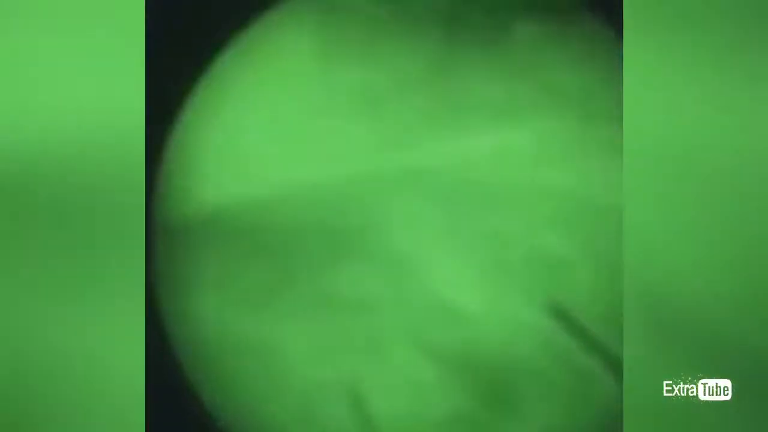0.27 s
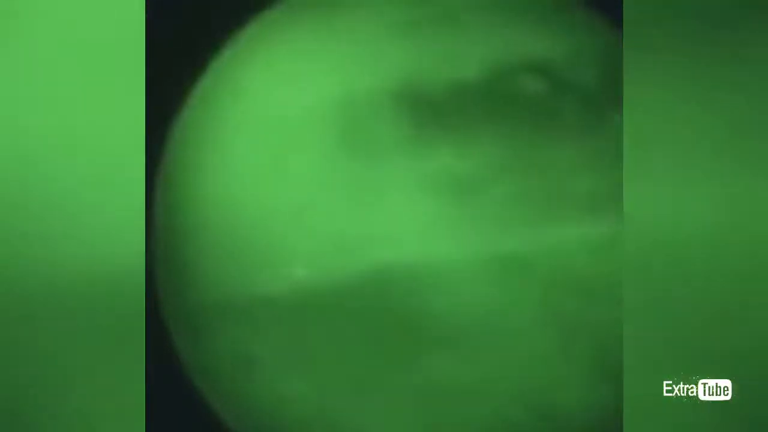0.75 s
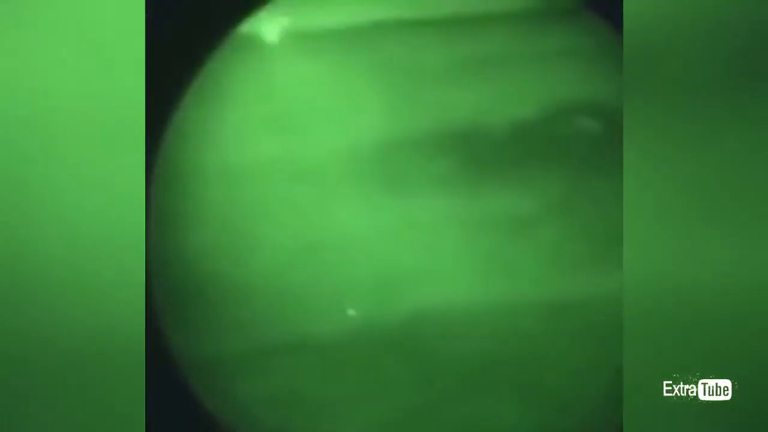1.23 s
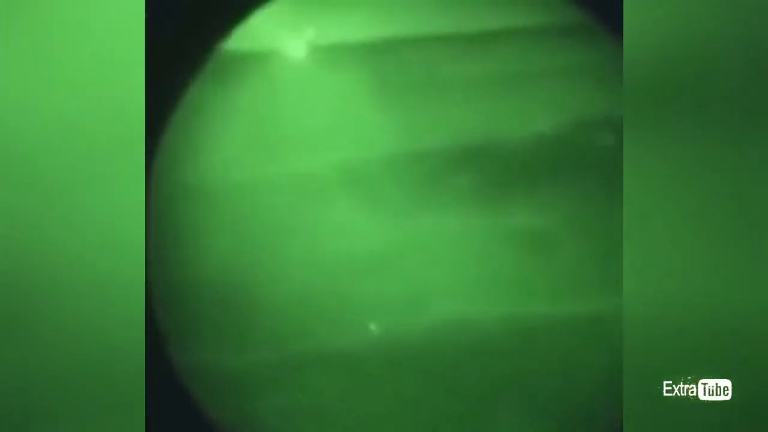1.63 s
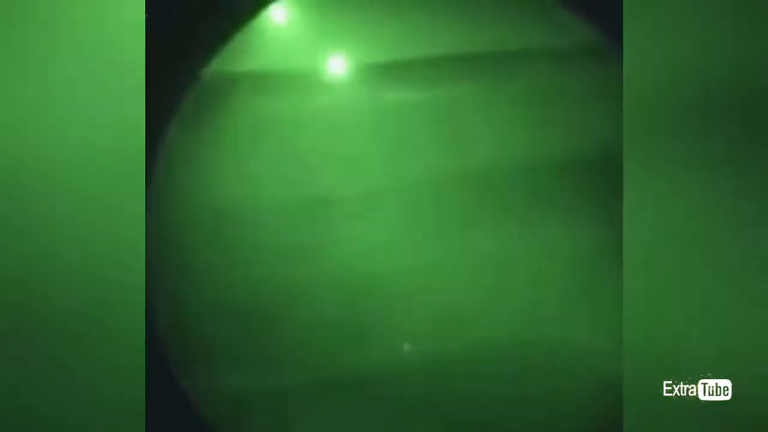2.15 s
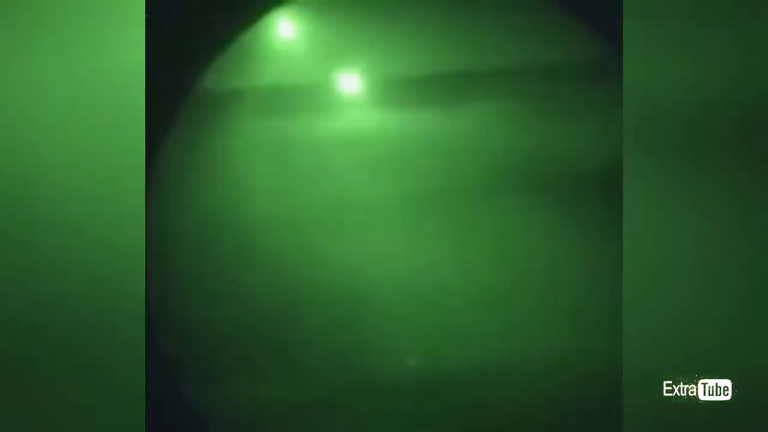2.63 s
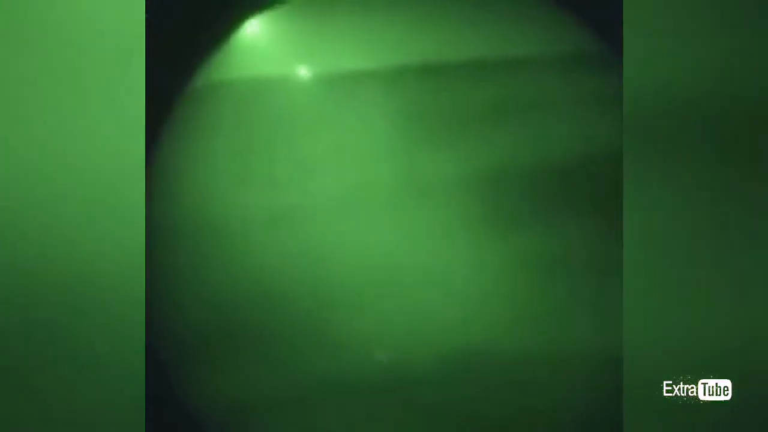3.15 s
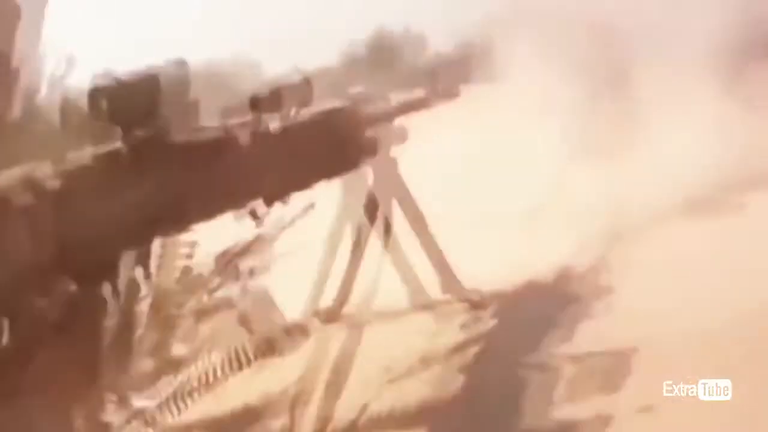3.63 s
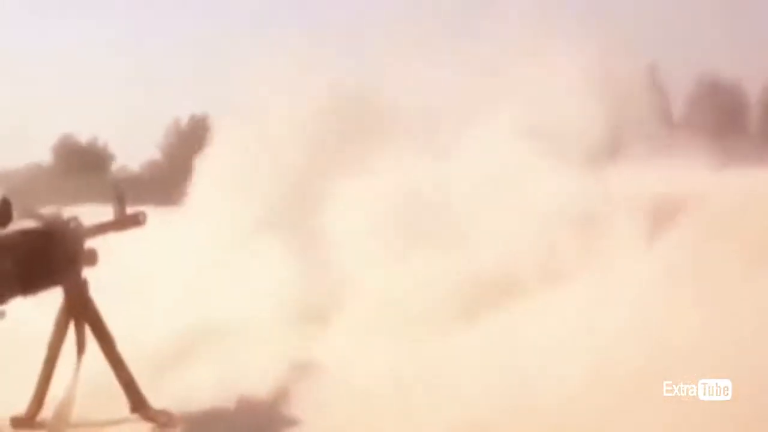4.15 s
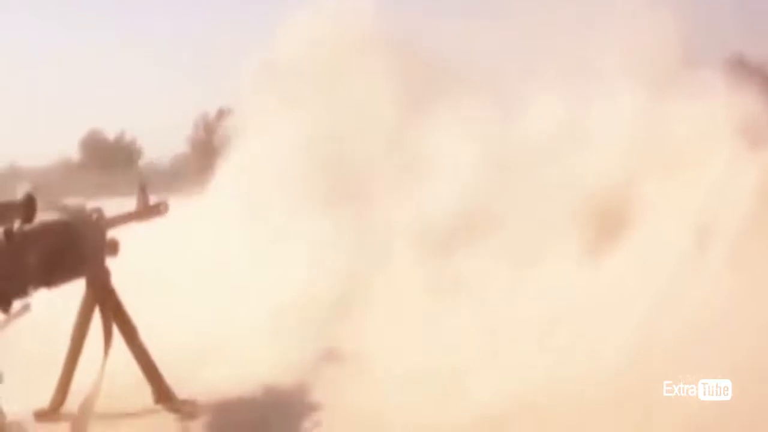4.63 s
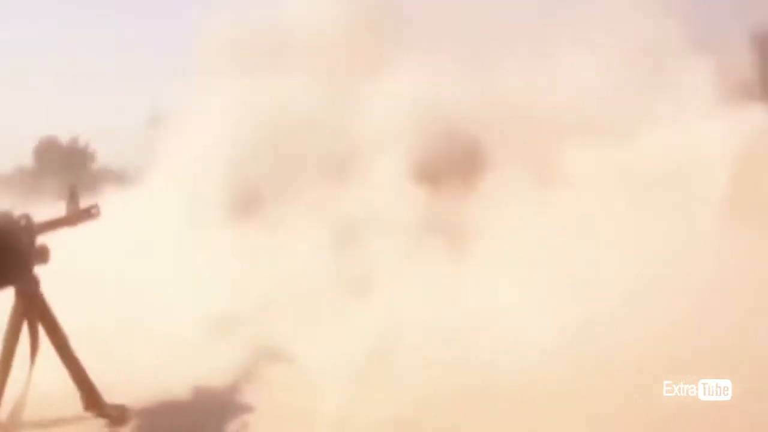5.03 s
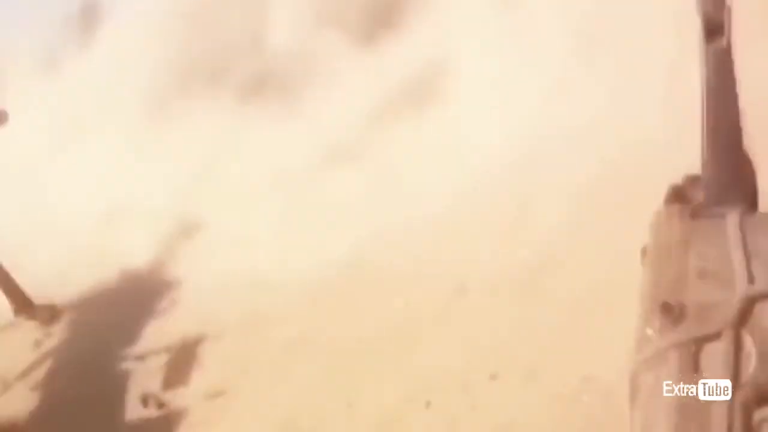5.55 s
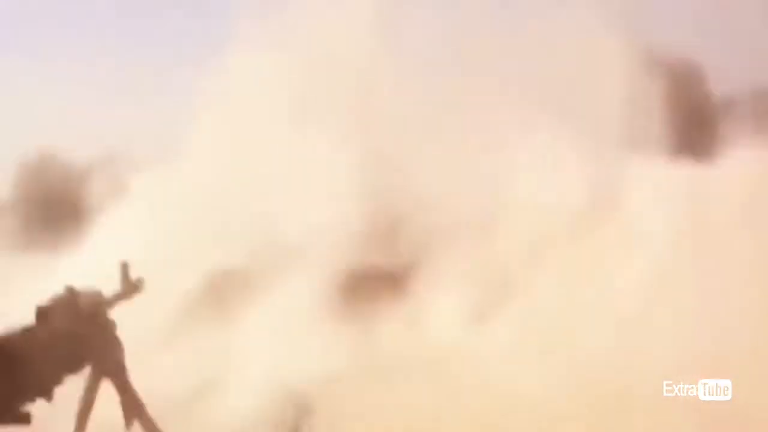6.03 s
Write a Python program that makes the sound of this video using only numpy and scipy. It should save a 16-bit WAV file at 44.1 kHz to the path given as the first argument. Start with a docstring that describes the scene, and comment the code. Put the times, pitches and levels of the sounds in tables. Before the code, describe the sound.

A heavy machine gun fires one last shot close by, belt links clank, a ricochet whines, and brass cases tinkle over a distant rumble. It fires ten thumping, metallic shots, its echo rolling over open land. After a blink of silence, a lighter gun cracks out a long, even burst that overloads the close microphone, then stops with small rattles.

```python
"""Two machine guns on an open range

The microphone stands close to each gun in turn, a moment of silence between them.
At night a heavy gun ends a burst, spent cases ring, and it fires again over the rolling echo of the land.
By day a lighter gun fires one long burst: each blast overloads the microphone and slaps back from ground and banks.
Blasts and clashes are shaped noise, slaps and pushes are short pressure waves, ringing metal is sines and resonances."""
import sys
import numpy as np
from scipy import signal
from scipy.fft import rfft, irfft, next_fast_len
from scipy.io import wavfile

SR = 44100
rng = np.random.default_rng(int(sys.argv[2]) if len(sys.argv) > 2 else 0)


def materialize(psi):
    """Save the field psi as 16-bit PCM at rate SR to the path in sys.argv[1].

    A 1-D psi becomes a single channel; in a 2-D psi each row is a channel.
    """
    bounded = np.clip(np.atleast_2d(psi).T, -1, 1)
    quanta = np.round(bounded * 32767).astype(np.int16)
    wavfile.write(sys.argv[1], SR, quanta)


N = 276939
TIME = np.arange(N) / SR
# In every spectrum table below, level_db shapes the tone only; the loudness is set where it is played.


def amp(db):
    """Decibels to gain."""
    return 10 ** (np.asarray(db) / 20)


def unit(x):
    """Scales to rms 1."""
    return x / np.sqrt(np.mean(x ** 2) + 1e-20)


def add(mix, s, sound):
    """Mixes a sound in at time s."""
    part = mix[max(round(s * SR), 0):][:len(sound)]
    part += sound[:len(part)]


def colour(x, spectrum):
    """Gives x a spectrum that falls away steeply beyond its ends; rms 1."""
    f, db = np.transpose(spectrum)
    size = next_fast_len(len(x))
    hz = np.fft.rfftfreq(size, 1 / SR) + 1  # keeps the logarithm finite
    ends = np.minimum(hz / f[0], 1) ** 2 * np.minimum(f[-1] / hz, 1) ** 2
    gain = ends * amp(np.interp(np.log(hz), np.log(f), db))
    return unit(irfft(rfft(x, size) * gain, size)[:len(x)])


def noise(spectrum, grain_db=0, grain_s=.002, size=N):
    """Coloured noise whose level wanders by grain_db, so that it comes in short clumps."""
    knots = rng.standard_normal(size // 8)
    clumps = np.interp(TIME[:size] / max(grain_s, .0003), np.arange(len(knots)), knots)
    return colour(rng.standard_normal(size) * amp(grain_db * clumps), spectrum)


def wander(u, knots):
    """Random curve through the knots, one knot per unit of u."""
    return np.interp(u, np.arange(len(knots)), knots)


def burst(t, rise, hold, fall):
    """Envelope that rises, holds until time hold and dies exponentially."""
    return np.clip(t / rise, 0, 1) * np.exp(-np.maximum(t - hold, 0) / fall)


def strikes(rows, shape):
    """Level of overlapping blows (start_s, level_db) that share one envelope; their powers add."""
    power = np.zeros(N)
    for s, db in rows:
        add(power, s, (amp(db) * shape) ** 2)
    return np.sqrt(power)


def pulse(t, hz, cycles):
    """A pressure wave reduced to a few swings about its trough."""
    return -np.cos(2 * np.pi * hz * t) * np.exp(-(t * hz / cycles) ** 2)


def ringing(spectrum, fall, share):
    """Response of a steel body: the blow itself plus a thicket of modes that die together."""
    t = TIME[:SR // 5]
    tail = noise(spectrum, size=len(t)) * np.exp(-t / fall)
    return np.sqrt(1 - share) * (t == 0) + np.sqrt(share) * tail / np.linalg.norm(tail)


def pings(spectrum, per_s, fall, count=90):
    """Many small pieces of metal, each with its own pitch, struck at random per_s times a second."""
    t, out = TIME[:SR // 8], np.zeros(N)
    for hz in rng.uniform(4000, 15500, count):
        ping = np.sin(2 * np.pi * hz * t) * np.exp(-t / fall)
        starts = np.cumsum(rng.exponential(1, size=120)) / per_s
        for s, size in zip(starts, rng.standard_normal(size=120)):
            add(out, s, amp(1.8 * size) * ping)
    return colour(out, spectrum)


# The land at night, one row each for rumble, boom and roar:
# shot_echo_db, echo_fall_s, far_hills_db, steady_background_db
NIGHT_LAND = [(-34, 0.2, -30, -43.5), (-31, 0.41, -37, -47.5), (-30, 0.24, -29, -38)]
# Spectrum of the low rumble: freq_hz, level_db
RUMBLE_SPECTRUM = [(15, -30), (25, -16), (59, -3), (97, -4.5), (140, -1.5), (170, -9), (220, -26),
                   (370, -120)]
# Spectrum of the hollow boom from afar: freq_hz, level_db
FAR_BOOM_SPECTRUM = [(130, -3.5), (190, 4), (260, -2), (340, -16), (480, -27.5)]
# Spectrum of the distant roar: freq_hz, level_db
ROAR_SPECTRUM = [(180, -32.5), (300, 0), (408, -3), (477, -3), (574, -2), (1470, -0.5), (3890, -18.5),
                 (7910, -32), (9090, -35), (12000, -57), (15600, -74), (22000, -120)]
# Spectrum of the blast scattered by ground and scrub: freq_hz, level_db
SCRUB_SPECTRUM = [(1200, -24), (2200, 11.5), (4000, 4.5), (6500, 3.5), (9000, -1.5), (14500, -12)]
HILLS_S, HILLS_RISE_S, HILLS_FALL_S = 1.41, 0.8, 0.42  # earlier fire returns from the far hills in one swell


def night_roll():
    """The land returns the shots as a lumpy rumble, a hollow boom and a distant roar; the nearer ground hisses."""
    hills = np.exp(np.minimum((TIME - HILLS_S) / HILLS_RISE_S, (HILLS_S - TIME) / HILLS_FALL_S))
    levels = []
    for echo_db, fall, hills_db, steady_db in NIGHT_LAND:
        echo = strikes([(row[0], echo_db) for row in HEAVY_GUN_SHOTS], burst(TIME, 0.017, 0.02, fall))
        levels.append(np.sqrt(echo ** 2 + (amp(hills_db) * hills) ** 2 + amp(steady_db) ** 2))
    rumble = levels[0] * noise(RUMBLE_SPECTRUM, grain_db=1.5, grain_s=0.012)
    boom = levels[1] * noise(FAR_BOOM_SPECTRUM, grain_db=1.0, grain_s=.015)
    roar = levels[2] * noise(ROAR_SPECTRUM, grain_db=1.9, grain_s=0.0042)
    hiss = strikes([row[:2] for row in HEAVY_GUN_SHOTS], burst(TIME[:SR], 0.039, 0.33, 0.14))
    hiss *= amp(-19.5) * noise(SCRUB_SPECTRUM, grain_db=2.5, grain_s=.006)
    return rumble + boom + roar + hiss


# Spectrum of the steady air by day: freq_hz, level_db
DAY_AIR_SPECTRUM = [(24, -65.5), (40, -21), (108, -28), (443, -2), (478, 1.5), (514, 0), (612, -0.5),
                    (1170, -18.5), (2580, -9), (3140, -22.5), (3930, -26), (5560, -29), (15000, -53)]


def day_air():
    """The steady, slightly uneven noise of the range by day."""
    return amp(-49) * noise(DAY_AIR_SPECTRUM, grain_db=2.5, grain_s=0.0055)


SLAP_NEAR_HZ, SLAP_FAR_HZ, SLAP_DULL_S = 715, 400, 0.015  # longer paths return a duller wave
SNAP_DB, SNAP_HZ, SNAP_REACH_S = -9.5, 1490, 0.054  # the sharp edge fades with the length of the path


def slap(t, delay):
    """One reflection of the blast: the longer its path, the duller it returns."""
    hz = SLAP_FAR_HZ + (SLAP_NEAR_HZ - SLAP_FAR_HZ) * np.exp(-delay / SLAP_DULL_S)
    snap = amp(SNAP_DB) * np.exp(-(delay / SNAP_REACH_S) ** 2)
    return pulse(t - delay, hz, 0.57) + snap * pulse(t - delay, SNAP_HZ, 0.81)


# Slaps from the ground and the banks after each shot: delay_s, level_db
BANK_SLAPS = [(0.0131, -4.5), (0.0233, -12.5), (.0265, -4.5), (0.0283, -13), (0.0428, -14), (0.0467, -8.5),
              (.0644, -10), (0.0847, -12), (0.0888, -20)]
# Spectrum of the scatter from the far slope: freq_hz, level_db
DAY_ECHO_SPECTRUM = [(24, -71), (40, -28.5), (177, -9.5), (206, -6.5), (346, -2), (466, -1.5), (643, -3),
                     (784, -6.5), (956, -15), (1230, -27), (1730, -21), (2280, -21), (4030, -29),
                     (5700, -36.5), (15000, -50)]
SIZZLE_SPECTRUM = [(1500, -26), (2100, -4.5), (2550, 3.0), (3200, -7), (4000, -2.5),
                   (5000, -24), (9000, -28.5)]  # freq_hz, level_db


def day_echoes():
    """Every shot meets the same ground and banks: distinct slaps, then scatter from the far slope."""
    t, out = TIME[:SR], np.zeros(N)
    slaps = sum(amp(db) * slap(t, delay) for delay, db in BANK_SLAPS)
    spread = burst(t - .008, 0.0076, 0.15, 0.089) + amp(-22.0) * burst(t, 0.087, 0.076, 0.14)
    scatter = noise(DAY_ECHO_SPECTRUM, grain_db=1, grain_s=0.0016, size=SR)  # the same after every shot
    for s, _, _ in LIGHT_GUN_SHOTS:
        stirred = noise(DAY_ECHO_SPECTRUM, grain_db=3.5, grain_s=.005, size=SR)  # new for each shot
        add(out, s, slaps + spread * (amp(-28.5) * scatter + amp(-27) * stirred))
    # the land already rings as the burst opens
    earlier = amp(-20.5) * burst(TIME - DAY_START_S, .001, 0.026, 0.19) * noise(DAY_ECHO_SPECTRUM)
    # the bullets' crack returns from down the range
    sizzle = strikes([row[:2] for row in LIGHT_GUN_SHOTS], burst(t, 0.13, 0.35, 0.2))
    sizzle *= amp(-37.5) * noise(SIZZLE_SPECTRUM, grain_db=3.0, grain_s=0.0041)
    return out + earlier + sizzle


# Short low waves by day: the first two are slaps from an earlier shot, the rest dull knocks:
# start_s (of the trough), level_db, pitch_hz
LOW_WAVES = [(3.4317, -3.5, 258), (3.454, -12, 540), (5.598, -11.5, 515), (5.609, -14, 536),
             (5.68, -21, 400), (5.805, -29, 450), (6.26, -28.5, 520)]


def low_waves():
    """Slaps from an earlier shot, then dull knocks, each a short pressure wave of a swing or two."""
    out = np.zeros(N)
    for s, db, hz in LOW_WAVES:
        add(out, s - .01, amp(db) * pulse(TIME[:SR] - .01, hz, .8))
    return out


# Ricochets whining away at night: start_s, length_s, level_db, first_pitch_hz, last_pitch_hz
RICOCHET_WHINES = [(0.145, 0.061, -29, 2200, 2320), (0.2, 0.15, -34, 2100, 1510),
                   (2.863, .11, -33, 2000, 1500)]
TUMBLE_HZ_SHARE, TUMBLE_DB, TUMBLE_S = 0.025, 3, 0.002  # a tumbling bullet flutters in pitch and level


def ricochets():
    """Tumbling bullets whine briefly, their pitch settling as they fly off."""
    out = np.zeros(N)
    for s, length, db, first_hz, last_hz in RICOCHET_WHINES:
        u = np.linspace(0, 1, int(length * SR))
        wobble, flutter = (wander(u * length / TUMBLE_S, k) for k in rng.standard_normal(size=(2, 80)))
        hz = last_hz + (first_hz - last_hz) * (1 - u) ** 2
        hz *= 1 + TUMBLE_HZ_SHARE * wobble
        level = amp(db + TUMBLE_DB * flutter) * np.sin(np.pi * u)
        add(out, s, level * np.sin(2 * np.pi * np.cumsum(hz) / SR))
    return out


# Spent cases bouncing: start_s, tick_db, ring_db
CASE_BOUNCES = [(0.874, -24, -25.5), (0.909, -23, -27), (1.063, -20, -19.5), (1.102, -22, -27),
                (1.141, -30, -27), (1.206, -35, -29.5), (1.274, -29, -32), (1.309, -22, -36.5),
                (1.365, -29, -52)]
# Ringing modes of a brass case, levels relative to each other: pitch_hz, level_db
BRASS_MODES = [(3774, -52), (5631, -47), (6551, -41), (7117, -31.5), (7650, -63), (8140, -32), (9033, -46),
               (10449, -42), (10837, -40), (11816, -51), (12252, -41), (13878, -35), (14740, -39),
               (15208, -39)]
# Spectrum of the tick at each bounce: freq_hz, level_db
TICK_SPECTRUM = [(4500, -21), (5300, -19), (6500, -4), (7700, 1), (9100, -1), (10000, -9), (14000, -24),
                 (15500, 1.5)]
# Short high pings of the cases as they bounce: start_s, level_db, pitch_hz
CASE_PINGS = [(0.873, -24.5, 4230), (0.907, -27, 4200), (1.135, -36, 4980), (1.207, -23, 6550),
              (1.285, -34, 4980)]
SKITTER_SPECTRUM = [(4500, -15), (5600, -29), (6500, 3), (7700, -14), (9100, 5), (10000, -23),
                    (14000, -17)]  # freq_hz, level_db
CASES_REST_S = 1.41
SPIN_S, SPIN_DB, SPIN_SHARE = 0.018, 5, 0.0014  # a tumbling case: time of a swing, its swing in level and in pitch


def cases():
    """Brass cases tick and ping as they bounce, ring unevenly as they tumble, and skitter until they rest."""
    t, ring = TIME[:SR * 3 // 4], np.zeros(N)
    hz, db = np.transpose(BRASS_MODES)[:, :, None]
    t60 = .7 * (8000 / hz) ** .7  # higher modes die sooner (s)
    for s, _, ring_db in CASE_BOUNCES:
        place, turn, detune = rng.standard_normal((3, len(hz), 1))
        # each mode swings towards and away from the microphone on its own
        facing = np.array([wander(t / SPIN_S, k) for k in rng.standard_normal(size=(len(hz), 64))])
        pitch = hz * (1 + 0.00077 * detune + SPIN_SHARE * facing[::-1])
        cycles = np.cumsum(pitch, axis=1) / SR
        modes = amp(db + 2.1 * place) * np.sin(2 * np.pi * (cycles + turn))
        modes *= amp(ring_db) / modes.sum(0).std()
        add(ring, s, (modes * amp(SPIN_DB * facing - 60 * t / t60)).sum(0))
    for s, ping_db, ping_hz in CASE_PINGS:
        add(ring, s, amp(ping_db) * np.sin(2 * np.pi * ping_hz * t) * np.exp(-t / 0.0069))
    ticks = strikes([row[:2] for row in CASE_BOUNCES], burst(t, .0008, 0.0023, 0.0094))
    ticks *= noise(TICK_SPECTRUM, grain_db=8)
    skitter = amp(-29.5) * burst(TIME - 1.09, 0.014, 0.039, 0.19)
    skitter *= pings(SKITTER_SPECTRUM, per_s=22, fall=0.013)
    return (ring + ticks + skitter) * np.exp(-np.maximum(TIME - CASES_REST_S, 0) / 0.0099)


# The heavy action after each shot, from unlocking to slamming shut on the next round:
# delay_s, level_db (relative)
HEAVY_BOLT_CYCLE = [(.001, -4), (.016, -4.5), (0.043, -12), (.083, -2.5), (0.095, -7.5)]
BOLT_SPREAD_DB = 0.5  # from blow to blow
SLACK_DB, SLACK_S = -11.5, 0.296  # the belt clashes more softly until it has pulled taut


def bolt_blows():
    """The action repeats one cycle after every shot of the full burst: rows (start_s, level_db)."""
    times = [row[0] for row in HEAVY_GUN_SHOTS[1:]]
    s, db = np.transpose([(shot + delay, db) for shot in times for delay, db in HEAVY_BOLT_CYCLE])
    slack = SLACK_DB * np.exp(-(s - times[0]) / SLACK_S)
    return list(zip(s, db + slack + BOLT_SPREAD_DB * rng.standard_normal(len(s))))


# Single clanks as the heavy gun starts, stops and the belt swings out, levels relative:
# start_s, clash_db, ring_db, link_pitch_hz (of the link that is hit)
BELT_CLANKS = [(.0044, -7.5, -24, 8620), (0.024, -10.5, -45, 8500), (.2094, -18, -38, 8800),
               (.385, -30, -48, 6000), (.546, -28, -40.5, 8700), (.5844, -33, -43.5, 8700),
               (.6674, -33, -58, 8700), (0.801, -32, -51, 8800), (1.601, -1.5, -40, 8650),
               (2.688, -12, -38, 6400), (2.7975, -19, -29.5, 6330), (2.865, -35, -29.5, 6420),
               (2.932, -36, -33, 8850), (2.995, -23, -36, 7200), (3.1167, -23, -31.5, 6405),
               (3.3785, -23, -48, 7400)]
# Spectrum of the clash of steel: freq_hz, level_db
STEEL_SPECTRUM = [(1760, -26.5), (3000, -14), (3420, -13.5), (5130, -9.5), (6210, -7.5), (8530, 4),
                  (10500, -14), (14600, -12), (15500, -18.5)]
# Resonances of the loose links, levels relative: pitch_hz, width_hz, level_db
LINK_RESONANCES = [(6380, 25, 1), (6450, 144, -3.5), (7060, 47, -4.5), (8650, 21, -3), (8820, 37, 2.5),
                   (9970, 27, -10.5), (10970, 82, -13.5), (14100, 52, -16.5)]
# Spectrum of the jingling links: freq_hz, level_db
JINGLE_SPECTRUM = [(3240, -51.5), (5500, -27), (6320, -3), (7610, -22), (8710, -2.5), (9830, -20),
                   (14300, -19), (15500, -16)]


def belt():
    """Steel links clash and ring the receiver, then jingle on in their own resonances."""
    blows = bolt_blows() + [row[:2] for row in BELT_CLANKS]
    clash = strikes(blows, burst(TIME[:SR // 2], 0.0018, 0.0029, 0.013))
    clash *= noise(STEEL_SPECTRUM, grain_db=4, grain_s=0.00062)
    receiver = ringing([(2000, 0.0078), (15000, 0)], fall=0.024, share=0.91)
    clash = signal.oaconvolve(clash, receiver)[:N]

    hz = np.fft.rfftfreq(N, 1 / SR)
    body = sum(amp(db) / (1 + (2 * (hz - f) / width) ** 2) for f, width, db in LINK_RESONANCES)
    shaking = noise([(4000, 0), (15000, 0)], grain_db=4.5, grain_s=.025)
    shiver = unit(irfft(rfft(shaking) * body, N))
    jingle = amp(-5.5) * shiver + amp(-5) * pings(JINGLE_SPECTRUM, per_s=13, fall=0.0256, count=130)

    # each shot shakes the loose links, each clank rings them
    shaken = strikes([(row[0], -27.5) for row in HEAVY_GUN_SHOTS], burst(TIME, 0.0397, 0.096, 0.25))
    t, tones = TIME[:SR], np.zeros(N)
    rung = amp(2) * strikes([(s, db) for s, _, db, _ in BELT_CLANKS], burst(t, .002, .025, 0.066))
    # the link that is hit sings out over the others
    for s, _, db, link_hz in BELT_CLANKS:
        add(tones, s, amp(db + 10) * np.sin(2 * np.pi * link_hz * t) * burst(t, 0.0069, 0, 0.037))
    return amp(-9.0) * clash + np.hypot(shaken, rung) * jingle + tones


def feed():
    """The belt jerks into the light gun: a few stray ticks in every cycle."""
    rows = []
    for s, _, _ in LIGHT_GUN_SHOTS:
        rows += zip(s + rng.uniform(.045, .11, size=3), -27 + 2 * rng.standard_normal(size=3))
    return strikes(rows, burst(TIME[:SR // 8], .0003, 0.00076, 0.00067))


# The light action's rattle around each shot: a faint noise just before it, then the cycling:
# delay_s (negative before the shot), level_db, length_s
LIGHT_ACTION = [(-.009, -19.5, 0.017), (0.019, -21.5, 0.00453), (0.067, -25, 0.0071), (.072, -37.5, .006),
                (0.084, -25, 0.0094)]
# Short rattles by the light gun: two with the opening slaps, the rest links dropping; levels relative:
# start_s, level_db
SHORT_RATTLES = [(3.4315, -11), (3.4535, -12), (3.5628, -17), (5.493, -12.5), (5.5563, -20), (5.58, -17),
                 (5.606, -19), (5.7796, -25.5), (6.0815, -36.5), (6.186, -35)]
# Spectrum of the rattling action and links: freq_hz, level_db
RATTLE_SPECTRUM = [(590, 8), (1000, 0.5), (1320, -55), (1970, -8), (2560, 4), (3300, -11), (4050, -1.5),
                   (5040, -15.5), (7970, -15.5), (14500, -53), (15500, -53)]
SETTLE_S, SETTLE_END_S, SETTLE_DB, SETTLE_DB_PER_S = 5.65, 6.25, -38, -9  # small links settle after the burst


def light_rattle():
    """The action rattles around each shot, and short rattles and dropping links join: noise in short envelopes."""
    t, action = TIME[:SR // 4], np.zeros(N)
    for s, _, _ in LIGHT_GUN_SHOTS:
        chance = rng.standard_normal((len(LIGHT_ACTION), 2))
        for (delay, db, length), (late, loud) in zip(LIGHT_ACTION, chance):
            rattle = amp(db + 0.5 * loud) * burst(t, 0.002, length / 2, length)
            add(action, s + delay * (1 + 0.096 * late), rattle)
    settle_times = rng.uniform(SETTLE_S, SETTLE_END_S, size=8)
    settling = [(s, SETTLE_DB + SETTLE_DB_PER_S * (s - SETTLE_S)) for s in settle_times]
    rattles = amp(-5) * strikes(SHORT_RATTLES + settling, burst(t, 0.00066, 0.00082, 0.0075))
    return (action + feed() + rattles) * noise(RATTLE_SPECTRUM, grain_db=1.5, grain_s=.0012)


def grazed(x, share):
    """Adds the bounce off the ground; its path changes as the microphone sways."""
    knots = rng.uniform(.0005, .0014, 64)  # delay of the bounce (s)
    delay = np.interp(TIME, np.linspace(0, TIME[-1], len(knots)), knots)
    return (x + share * np.interp(TIME - delay, TIME, x)) / np.hypot(1, share)


# Light gun close to the microphone, one row a shot: start_s, blast_db, push_db (low push of the gas wave)
LIGHT_GUN_SHOTS = [(3.4886, -5, -22), (3.6058, -6, -42), (3.7252, -4.5, -19), (3.8423, -6, -28),
                   (3.9629, -6.5, -26), (4.0854, -6, -15), (4.2113, -6, -21), (4.3374, -4, -23),
                   (4.4538, -4.5, -30), (4.5727, -6.5, -21), (4.695, -3, -25), (4.8188, -6, -37),
                   (4.94, -5, -40), (5.0574, -3.5, -75.5), (5.182, -5.5, -47.5), (5.308, -7, -20),
                   (5.433, -5.5, -12)]
# Spectrum of the tearing crack: freq_hz, level_db
CRACK_SPECTRUM = [(35, -43), (60, -13), (572, -3), (1230, -10), (2530, -4), (3120, -9), (3760, -0.5),
                  (4520, -9), (7900, -14.5), (11700, -23.5), (12900, -24.5), (14500, -23.5), (15500, -45)]
# Spectrum of the blast scattered by the nearby ground: freq_hz, level_db
BARK_SPECTRUM = [(500, 4), (900, -20), (1600, 3.5), (2400, -31), (4000, -21.5), (8000, -22.5), (14000, -32)]


def light_gun():
    """A short tearing crack, a bark and a low push for each shot."""
    t, shots = TIME[:SR // 4], np.array(LIGHT_GUN_SHOTS)[:, :2]
    crack = strikes(shots, burst(t, 0.00017, 0.0079, 0.0019))
    crack *= noise(CRACK_SPECTRUM, grain_db=0.5, grain_s=0.0013)
    bark = amp(-19.5) * strikes(shots, burst(t - .006, 0.0048, 0.0236, 0.00078))
    bark *= noise(BARK_SPECTRUM, grain_db=0.5, grain_s=0.00088)
    push = np.zeros(N)
    for s, _, push_db in LIGHT_GUN_SHOTS:
        add(push, s - .01, amp(push_db) * pulse(t - .015, 45, 0.18))
    return grazed(crack, share=0.17) + bark + push


# Heavy gun close to the microphone, one row a shot: start_s, blast_db, thump_db, boom_db
HEAVY_GUN_SHOTS = [(0.0, -18, -19, -25), (1.601, -15.5, -12, -13), (1.716, -16.5, -11, -27),
                   (1.821, -15.5, -12, -25.5), (1.936, -16.5, -8, -22.5), (2.044, -15.5, -8, -22),
                   (2.148, -15.5, -8.5, -25.5), (2.253, -14, -12, -23), (2.356, -14, -9.5, -19.5),
                   (2.47, -15.5, -13, -20.5), (2.577, -16, -9, -19.5)]
# Spectrum of the ragged blast: freq_hz, level_db
HEAVY_BLAST_SPECTRUM = [(120, -28), (200, -5), (430, -1), (596, -7.5), (1400, -7.5), (1560, -3.5),
                        (4750, -12), (8660, -10.5), (15500, -25)]
# Spectrum of the near echo of the heavy gun: freq_hz, level_db
NEAR_BOOM_SPECTRUM = [(40, -24.5), (110, 1), (190, -7.5), (290, -0.5), (420, -7.5), (700, -22),
                      (1500, -21.5)]
THUMP_DELAY_S = 0.0232  # the gas wave follows the blast


def heavy_gun():
    """A long ragged blast, a low thump that sinks in pitch, and a boom from the surroundings."""
    shots, t = np.array(HEAVY_GUN_SHOTS), TIME[:SR]
    blast = strikes(shots[:, :2], burst(t, 0.0023, 0.02, 0.026))
    blast *= noise(HEAVY_BLAST_SPECTRUM, grain_db=3, grain_s=.0012)
    steel = ringing([(300, 0.0063), (15000, 0)], fall=0.017, share=0.068)
    blast = signal.oaconvolve(blast, steel)[:N]
    boom = strikes(shots[:, [0, 3]], burst(t - .022, 0.0028, 0.012, 0.1)) * noise(NEAR_BOOM_SPECTRUM)
    sinking_hz = 32 + 62 * np.exp(-t / 0.0094)
    thump = -np.sin(2 * np.pi * np.cumsum(sinking_hz) / SR) * burst(t, 0.0024, 0.0026, 0.0077)
    thumps = np.zeros(N)
    for s, _, db, _ in shots:
        add(thumps, s + THUMP_DELAY_S, amp(db) * thump)
    return blast + boom + thumps


NIGHT_END_S, DAY_START_S = 3.411, 3.432


def scene():
    """Night, a moment of silence, then day; both sit in the middle."""
    night = night_roll() + ricochets() + cases() + belt() + heavy_gun()
    night *= np.clip((NIGHT_END_S - TIME) / 0.0019, 0, 1)
    day = day_air() + day_echoes() + low_waves() + light_rattle() + light_gun()
    day *= np.clip((TIME - DAY_START_S) / 0.00047, 0, 1)
    return np.array([night + day, night + day])


CEILING, EDGE_HZ = .88, 15600  # overload level (full scale 1) and upper band limit of the microphone


def record(dry):
    """The microphone overloads with a firm knee; then the band limit."""
    clipped = dry / (1 + (dry / CEILING) ** 6) ** (1 / 6)
    low_pass = signal.firwin(255, EDGE_HZ, window=("kaiser", 9), fs=SR)
    return signal.oaconvolve(clipped, low_pass[None], "same")


dry = scene()
out = record(dry)
materialize(out)
```